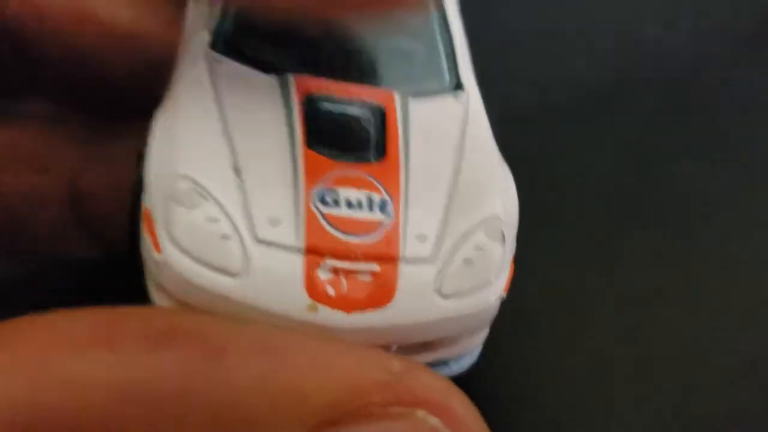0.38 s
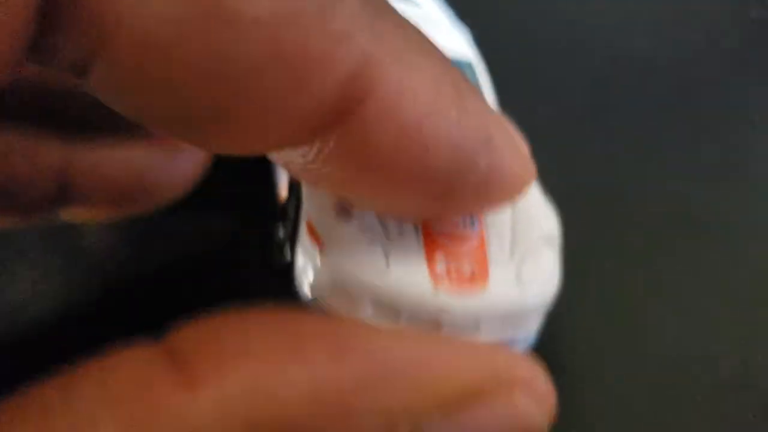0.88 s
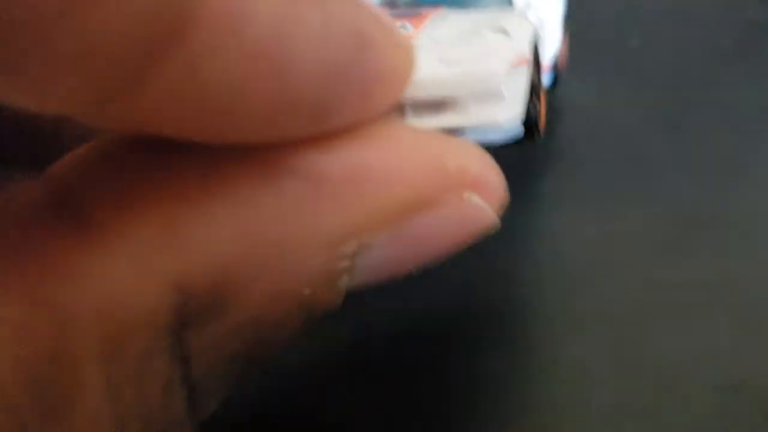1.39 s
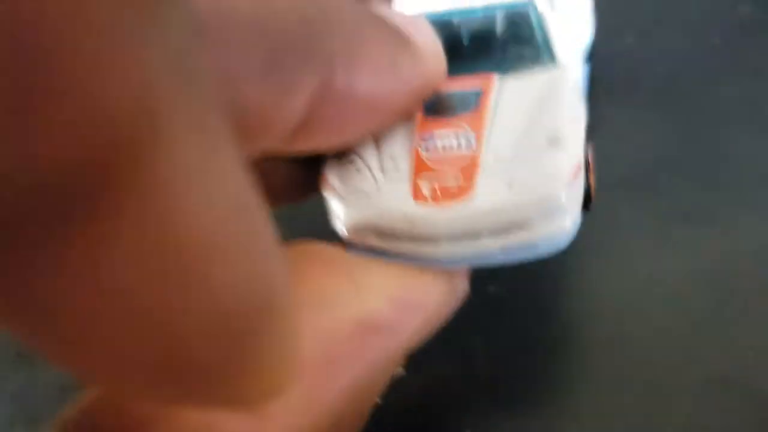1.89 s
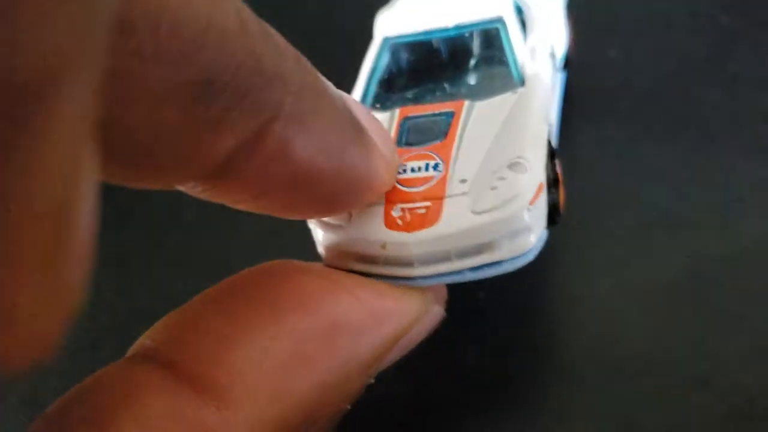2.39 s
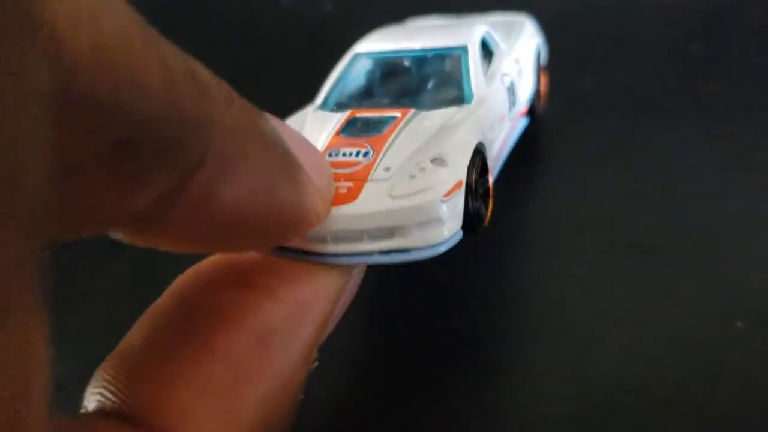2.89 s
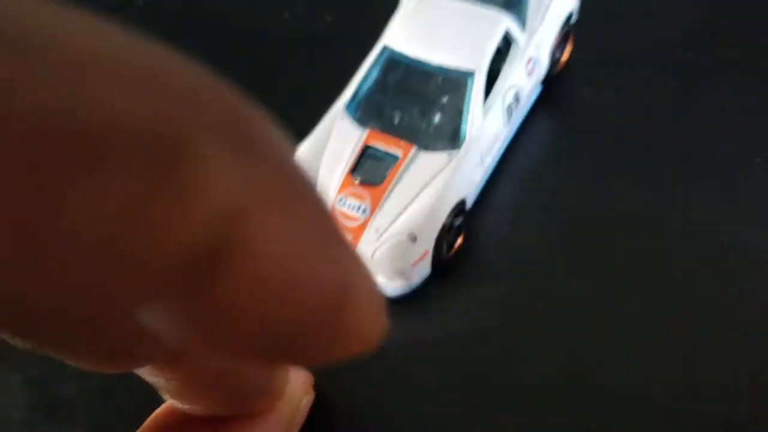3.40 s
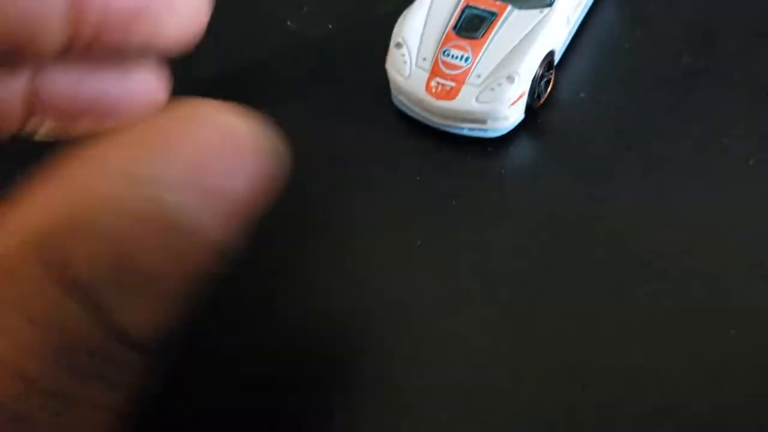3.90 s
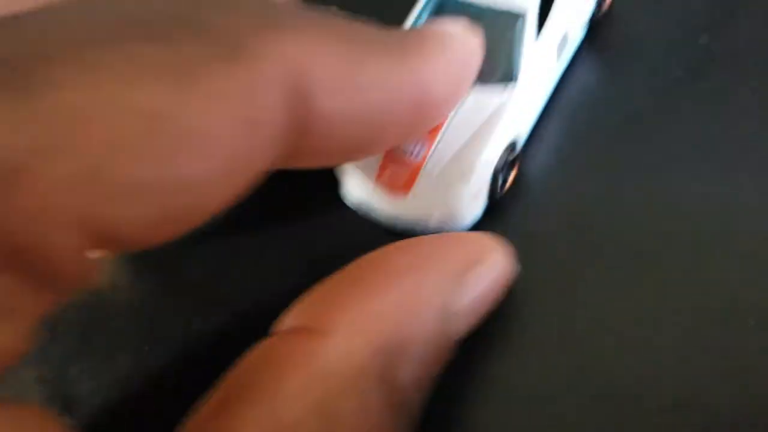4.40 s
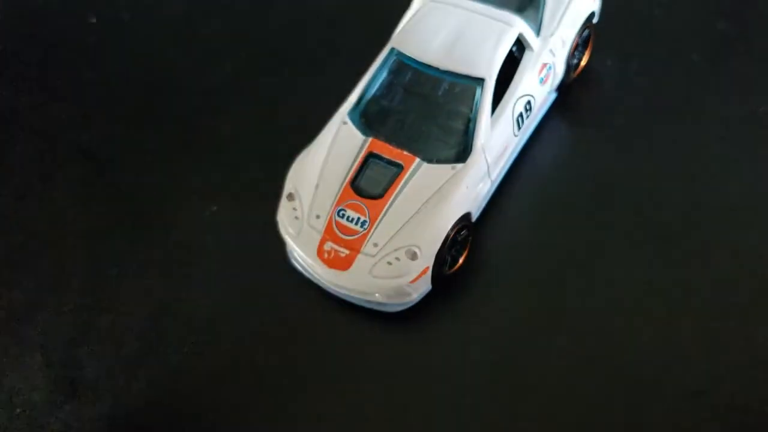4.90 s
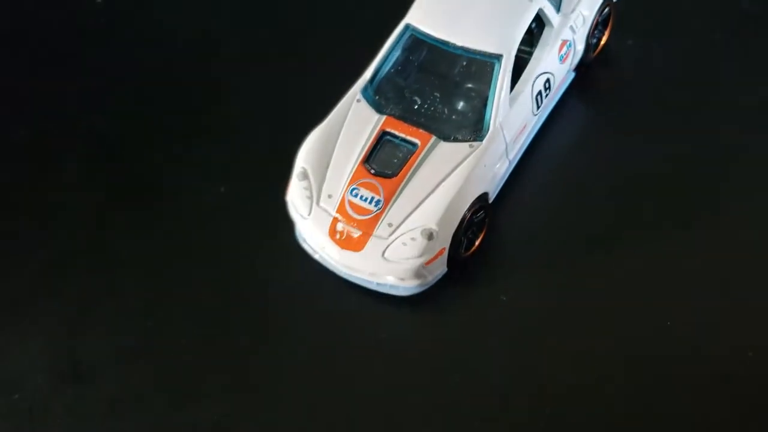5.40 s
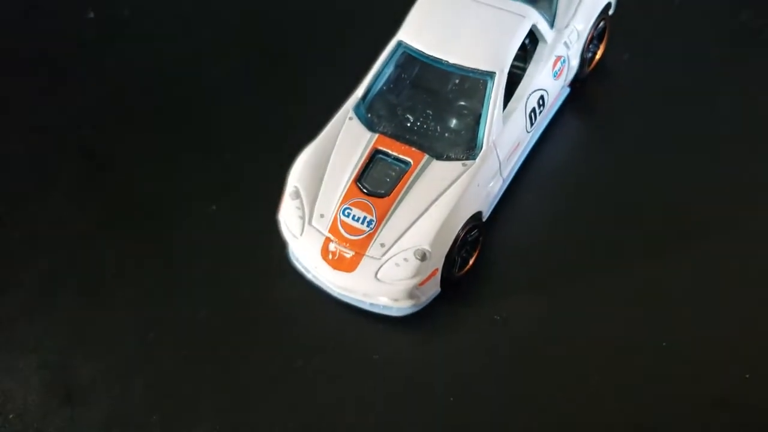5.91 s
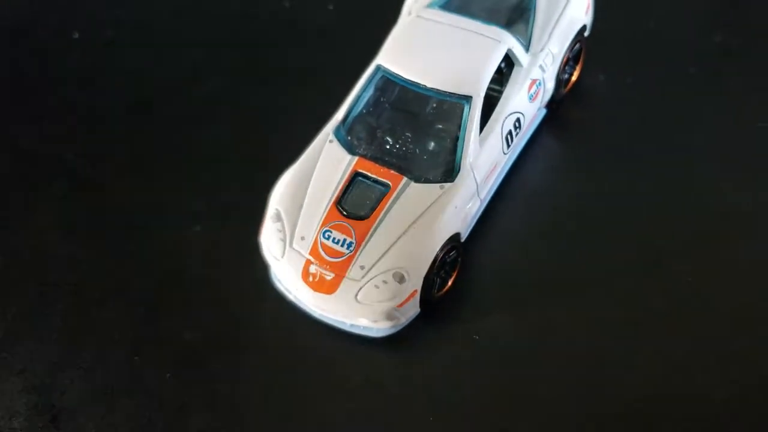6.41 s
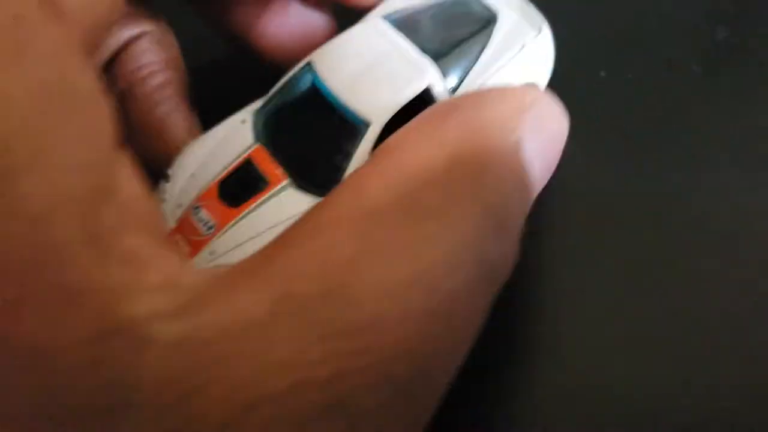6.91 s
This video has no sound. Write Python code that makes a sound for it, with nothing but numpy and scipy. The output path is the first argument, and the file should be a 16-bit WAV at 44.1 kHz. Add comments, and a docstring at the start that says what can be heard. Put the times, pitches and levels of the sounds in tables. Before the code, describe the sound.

A toy car's metal shell and wheels click and scrape on a tabletop, then coarse finger friction fills the left side, including a hard pop. A brief flurry of bright, overlapping metal knocks with dull table thuds is the loudest moment. The room drops to soft hiss and low hum, with slight wheel rubbing and skin rustle, before the car is gripped again with a short gritty scrape. Dry, close and intimate.

```python
"""A small die-cast toy car, turned by fingers close to a two-port microphone, ticks, drops and clatters.
Knocks are noise bursts ringing the metal shell; cracks are short single tones, thuds are damped swings.
A fingertip drags beside the left port: grains of noise and two snaps. Scrapes, table rumble and hum, and
skin rustle are swelling grains of noise too. Behind it lies the filtered noise of a quiet room."""
import sys
import numpy as np
from scipy import signal
from scipy.fft import rfft, irfft
from scipy.io import wavfile
from scipy.ndimage import uniform_filter1d

SR = 44100
rng = np.random.default_rng(int(sys.argv[2]) if len(sys.argv) > 2 else 0)


def generate_wav(sig):
    """Save sig (samples, or channels by samples) to the path in sys.argv[1] as 16-bit PCM at SR."""
    pcm = np.round(np.clip(np.atleast_2d(sig).T, -1, 1) * 32767).astype(np.int16)
    wavfile.write(sys.argv[1], SR, pcm)


def field_ratio(decibels):
    """Amplitude ratio for a level in dB (20 dB per decade); scalars and array-likes work."""
    return 10 ** (np.asarray(decibels, dtype=float) / 20)


N = 310464  # length in samples
GRID = np.fft.rfftfreq(4096, 1 / SR)  # frequencies in Hz at which filters are drawn


def read(points, hz):
    """Reads a table of (Hz, value) at any frequency, with straight lines on a log pitch scale."""
    f, value = np.transpose(points)
    return np.interp(np.log(hz + 1), np.log(f + 1), value)


def causal(gain):
    """Minimum-phase filter taps, which ring only after a blow, for a gain from 0 Hz to SR / 2."""
    log = np.log(np.maximum(gain, 1e-5))
    full = np.concatenate([log, log[-2:0:-1]])
    return np.fft.ifft(np.exp(np.conj(signal.hilbert(full)))).real[:len(gain)]


def colour(x, gain):
    """Filters x so that white noise keeps its power."""
    taps = causal(gain)
    taps = taps / np.linalg.norm(taps)
    return signal.oaconvolve(x, taps[None], axes=1)[:, :N]


def sides(x, points, share):
    """Sets left above right by twice the table's dB; share (0 to 2) is how much of it lifts the left."""
    tilt_db = read(points, GRID)
    taps = np.array([causal(field_ratio(share * tilt_db)), causal(field_ratio((share - 2) * tilt_db))])
    return signal.oaconvolve(x, taps, axes=1)[:, :N]


def grit(per_s, spread_db, same, lag):
    """Stick-slip grains of uneven size, power 1; partly shared by the ports, the left one late by lag ms."""
    size = field_ratio(spread_db * np.minimum(rng.exponential(1, N), 5))
    size = size * (rng.random(N) < per_s / SR)
    size = np.sqrt(uniform_filter1d(size ** 2, size=12) + 1e-12)
    a, b = size * rng.standard_normal((2, N))
    same = np.clip(same, 0, 1)
    late = np.interp(np.arange(N) - lag * SR / 1000, np.arange(N), a)
    left = same * late + np.sqrt(1 - same ** 2) * np.roll(b, 3)
    both = np.array([left, a])
    return both / np.sqrt(np.mean(both ** 2))


def resonate(x, hz, width):
    """A resonance of gain 1, width in Hz, whose pitch follows the curve hz."""
    turn = np.exp(2j * np.pi * np.cumsum(hz) / SR)
    r = np.exp(-np.pi * width / SR)
    return 2 * (turn * signal.lfilter([1 - r], [1, -r], x / turn)).real


def swells(rows, levels_db):
    """Gain over time of overlapping swells, added in power; rows start with peak, rise and fall."""
    edge_db, roundness = -17.5, 1.28  # level one rise or fall away from the peak; 1 = pointed, 2 = round top
    t, power = np.arange(0, N, 32) / SR, 0
    for (peak, rise, fall, *_), db in zip(rows, levels_db):
        away = np.where(t < peak, (peak - t) / rise, (t - peak) / fall)
        power = power + field_ratio(np.maximum(db + edge_db * away ** roundness, -200)) ** 2
    return np.interp(np.arange(N) / SR, t, np.sqrt(power))


# Colour of the room tone. Each row: frequency in Hz, relative level in dB.
ROOM_COLOUR = [(12, -39.5), (20, -8.5), (68, -3.5), (120, -11), (138, -26), (193, -15.5), (262, -24),
               (301, -22), (780, -34.5), (1190, -21.5), (1710, -11), (2820, -36), (4420, -28.5),
               (6540, -39), (16000, -37.5)]
# Balance of the room tone; a whirr near 1.6 kHz sits left. Each row: frequency in Hz, left over right in dB.
ROOM_BALANCE = [(60, 1), (110, 0), (200, 1), (380, 4), (700, 2.5), (1290, 21.5), (2380, 16), (4400, 10),
                (8120, 5.5), (15000, -1)]
# How alike the ports hear the room. Each row: frequency in Hz, likeness (1 = same, negative = opposed).
ROOM_LIKENESS = [(60, 0.692), (240, 0.42), (950, -0.35), (3770, -0.06), (15000, 0.22)]
# The room tone sinks after the clatter. Each row: time in seconds, change of level in dB.
ROOM_LEVEL = [(3.3, 2), (3.55, -4), (3.78, -13.5), (3.95, -6.5), (4.2, -9), (4.9, 2)]


def room():
    """Room tone: filtered noise, more alike at the two ports in the lows than higher up."""
    hz = np.fft.rfftfreq(N, 1 / SR)
    a, b = rfft(rng.standard_normal((2, N)), axis=1)
    same = np.clip(read(ROOM_LIKENESS, hz), -1, 1)
    tilt_db = read(ROOM_BALANCE, hz)
    left = a * field_ratio(tilt_db / 2)
    right = (same * a + np.sqrt(1 - same ** 2) * b) / field_ratio(tilt_db / 2)
    mid = np.sqrt(field_ratio(tilt_db) + field_ratio(-tilt_db) + 2 * same) / 2  # size of the average of both ports
    tone = irfft(np.array([left, right]) * field_ratio(read(ROOM_COLOUR, hz)) / mid, N, axis=1)
    change_db = np.interp(np.arange(N) / SR, *np.transpose(ROOM_LEVEL))
    return field_ratio(-68.5 + change_db) * tone / np.std(tone.mean(0))


# How long the room echoes. Each row: frequency in Hz, time to die by 60 dB in seconds.
ECHO_TIME = [(150, 0.15), (1000, 0.25), (4000, 0.13), (12000, 0.13)]


def echo(x):
    """Room echo: sparse taps of random sign, each band dying at its own speed."""
    taps = np.zeros((2, SR // 2))
    at = np.arange(120, SR // 2 - 20, 20)
    at = at + rng.integers(0, 20, (2, len(at)))
    np.put_along_axis(taps, at, rng.choice([-1., 1.], at.shape), 1)
    hz, t, z = signal.stft(taps, SR, nperseg=256)
    decay = field_ratio(-60 * t / read(ECHO_TIME, hz)[:, None])
    tail = signal.istft(z * decay, SR, nperseg=256)[1]
    return signal.oaconvolve(x, tail / np.linalg.norm(tail[0]), axes=1)[:, :N]


# Ways the table top rings. Each row: frequency in Hz, width in Hz, relative level in dB.
TABLE_MODES = [(80, 51, -1.5), (138, 43, 2), (224, 66, -0.5), (379, 12, 2.5), (485.4, 100, -2),
               (648, 75, -8.5), (780.3, 40, -8), (1342, 36, -12)]


def table_gain(first=0, last=None):
    """Summed resonances of the table top, from the chosen rows of its table."""
    power = 0
    for hz, width, db in TABLE_MODES[first:last]:
        power = power + field_ratio(2 * db) / (1 + (2 * (GRID - hz) / width) ** 2) ** 1.35
    return np.sqrt(power) * GRID / (GRID + 40)


# Extra swells of skin rustle, some during strokes of the car. Each row: peak in seconds, rise in seconds,
# fall in seconds, level in dB.
RUSTLE_SWELLS = [(1.0, .5, 0.17, -77), (1.36, .05, .03, -60), (1.861, .08, 0.055, -65.5),
                 (3.12, 0.17, .2, -62.5), (3.96, .1, .4, -70.5), (4.45, .2, .25, -70.5),
                 (4.819, .2, .12, -61), (5.29, .06, .2, -70.5), (5.51, 0.029, 0.16, -61),
                 (5.59, .12, 0.2, -64.5), (5.96, .025, 0.089, -60.5), (6.05, .1, 0.09, -69),
                 (6.7, .15, 0.11, -59.5), (6.86, .03, .1, -59.5), (7.0, .1, .1, -55)]
# Colour of the skin rustle. Each row: frequency in Hz, relative level in dB.
RUSTLE_COLOUR = [(3530, -42.5), (6000, -14.5), (7740, -7.5), (9460, -23), (11900, -6.5), (15000, -4),
                 (16000, -4.5)]
# Balance of the rustle. Each row: frequency in Hz, half of left over right in dB.
RUSTLE_BALANCE = [(5000, 1), (8100, -3.5), (12000, -6), (15000, -1.5)]


def rustle(contact):
    """Skin rustle: fine, fast grains that follow the contact, with extra swells added in power."""
    with_contact = field_ratio(-70) * contact ** 0.88
    extra = swells(RUSTLE_SWELLS, np.transpose(RUSTLE_SWELLS)[-1])
    skin = np.hypot(with_contact, extra)
    grains = colour(skin * grit(15000, 1.5, 0.17, .05), field_ratio(read(RUSTLE_COLOUR, GRID)))
    return sides(grains, RUSTLE_BALANCE, 0.11)


# Wheels roll and the table hums up. Each row: start in seconds, end in seconds, lift in dB.
ROLLS = [(2.99, 3.478, 11), (3.91, 4.3, 5), (4.32, 4.617, 6.5), (4.622, 4.93, 11), (6.674, 6.705, 9)]


def hum(contact):
    """Table hum: grains ring the upper modes of the table, growing faster than the contact."""
    t = np.arange(N) / SR
    lift_db = sum(1. * db * (t > start) * (t < end) for start, end, db in ROLLS)
    lift_db = uniform_filter1d(lift_db, size=1500)  # soft edges
    gain = field_ratio(-65.5 + lift_db) * contact ** 1.2
    return colour(gain * grit(2700, 2.6, 0.93, 0.025), table_gain(first=5))


# Pitch that the table rumble leans to. Each row: time in seconds, pitch in Hz.
RUMBLE_LEAN = [(1.08, 300), (1.21, 380), (1.49, 383), (1.62, 212), (3.0, 455), (3.15, 376), (3.22, 181),
               (3.34, 219), (3.86, 221), (3.97, 467), (4.22, 212), (4.55, 237), (4.85, 347.4),
               (4.95, 167.3), (6.52, 176), (6.63, 415), (6.83, 280), (6.93, 347), (7.04, 258)]


def rumble(lean):
    """Table rumble: grains ring the low modes of the table, with a resonance that wanders in pitch."""
    low = colour(lean * grit(2000, 0.99, 0.9, 0.055), table_gain(last=5))
    pitch_hz = np.interp(np.arange(N) / SR, *np.transpose(RUMBLE_LEAN))
    return low + field_ratio(6.5) * resonate(low, pitch_hz, 120)


# Colour of wheels and shell scraping. Each row: frequency in Hz, relative level in dB.
SCRAPE_COLOUR = [(530, -36), (900, -11.5), (1110, -2), (1610, -3.5), (1680, -9), (1840, -1), (1990, -6),
                 (3650, -3), (4890, -5), (5350, -10), (10000, -34), (13000, -61.5), (22000, -120)]


def scrape(press):
    """Wheels and shell scrape: dense stick-slip grains; a hard scrape makes the shell sing."""
    rasp = colour(press * grit(6800, 0.93, 0.24, 0.076), field_ratio(read(SCRAPE_COLOUR, GRID)))
    sing = 4.7 * press ** 2 / (press ** 2 + field_ratio(-86))
    ring = resonate(rasp[1], np.full(N, 3750.), 350)
    return rasp + sing * ring * np.array([[-.45], [1.1]])  # opposed at the two ports


# Swells of scrape and rumble; a stroke may take several overlapping swells. Each row: peak in seconds,
# rise in seconds, fall in seconds, scrape level in dB, table rumble level in dB.
STROKE_SWELLS = [(0.0, .1, 0.4, -65.5, -72.5), (0.351, 0.37, 0.25, -89.5, -77),
                 (0.676, 0.16, 0.25, -51.5, -66.5), (0.719, 0.028, 0.06, -49.5, -47),
                 (1.041, .3, 0.17, -61.5, -76), (1.215, 0.0036, 0.036, -54, -47.5),
                 (1.361, 0.055, 0.024, -45.5, -51), (1.29, 0.039, 0.11, -66.5, -55.5),
                 (1.46, 0.067, 0.062, -59, -54.5), (1.51, 0.11, 0.12, -57.5, -73),
                 (1.78, 0.53, 0.34, -69, -84), (3.03, 0.086, 0.36, -54.5, -62),
                 (3.16, 0.14, 0.26, -50.5, -68), (3.238, 0.01, 0.062, -49.5, -54),
                 (3.321, 0.015, 0.033, -37.5, -57), (3.499, 0.06, 0.059, -45.5, -50),
                 (3.56, 0.062, 0.15, -54, -67), (3.64, 0.2, 0.21, -70.5, -65.5),
                 (3.98, 0.17, 0.53, -63.5, -70), (4.401, .17, 0.4, -61.5, -63),
                 (4.549, 0.43, 0.2, -58, -85), (4.819, .22, 0.16, -51.5, -71.5),
                 (4.9, 0.11, .025, -59.5, -79), (5.3, 0.077, 0.27, -69, -86),
                 (5.991, .01, .12, -65.5, -91.5), (6.46, 0.11, 0.1, -61, -89.5),
                 (6.522, 0.0098, 0.14, -50, -60), (6.71, 0.166, 0.24, -52.5, -65.5),
                 (6.868, 0.0176, 0.16, -42, -52), (6.895, .03, 0.062, -40.5, -56),
                 (6.935, 0.055, 0.037, -41, -51.5), (6.99, .08, .08, -50, -57.5),
                 (7.03, .03, 0.093, -44, -55.5)]
# Balance of sound from the car. Each row: frequency in Hz, half of left over right in dB.
CAR_BALANCE = [(60, -2.5), (110, -2), (200, -0.5), (380, 0), (700, -1.5), (1290, -1), (2380, -5),
               (4400, -2.5), (8120, 1), (15000, -10)]


def handling():
    """Strokes of fingers and car: the car scrapes, the table rumbles and hums under it, skin rustles."""
    scrape_db, rumble_db = np.transpose(STROKE_SWELLS)[-2:]
    press = swells(STROKE_SWELLS, scrape_db)
    lean = swells(STROKE_SWELLS, rumble_db)
    contact = np.sqrt(press * lean) / field_ratio(-58.5)  # 1 where hum and rustle have their base levels
    car = scrape(press) + rumble(lean) + hum(contact)
    return sides(car, CAR_BALANCE, 1.0) + rustle(contact)


# Two drags of the fingertip, a list of rows for each. Each row: time in seconds, pressure as a level in dB.
DRAGS = [
    [(1.874, -64.5), (1.891, -31.5), (1.905, -30), (1.93, -36.5), (1.95, -38), (2.016, -28.5),
     (2.048, -30.5), (2.082, -43.5), (2.132, -32), (2.236, -27.5), (2.322, -39.5), (2.345, -65)],
    [(2.438, -75), (2.458, -50), (2.504, -36.5), (2.606, -39.5), (2.73, -34), (2.838, -37), (2.914, -31.5),
     (2.996, -35), (3.004, -45), (3.06, -45.5), (3.075, -55)],
]
# Colour of the drag's body. Each row: frequency in Hz, relative level in dB.
DRAG_COLOUR = [(88, -69), (150, -16), (255, -13), (293, -9.5), (506, 4), (906, 2.5), (1460, 3.5), (1800, 1),
               (2250, 1), (3570, 5), (7200, -4.5), (9000, -22), (11700, -59), (19800, -120)]
# Colour of the drag's treble. Each row: frequency in Hz, relative level in dB.
DRAG_TREBLE = [(7000, -39.5), (8700, -7.5), (11000, 0.5), (14500, 2.5), (16500, -11)]
# How little reaches the right port. Each row: frequency in Hz, half of left over right in dB.
DRAG_BALANCE = [(60, 1), (110, 6), (200, 41), (380, 48), (700, 18), (1290, 17), (2380, 39), (4400, 32),
                (8120, 40), (15000, 23)]
# The fingertip snaps free. Each row: start in seconds, level in dB, level of its slow push against it in dB.
SNAPS = [(1.891, -25.5, 9), (2.1779, -8, -2)]


def rub():
    """A fingertip drags beside the left port: stick-slip grains, a drifting hollow tone and two snaps."""
    t, drag = np.arange(N) / SR, np.zeros(N)
    for rows in DRAGS:
        s, db = np.transpose(rows)
        drag += field_ratio(np.interp(t, s, db, left=-200, right=-200))
    body = colour(drag * grit(7000, 0.81, 0.52, -.5), field_ratio(read(DRAG_COLOUR, GRID)))
    catches = colour(drag * grit(2500, 2.0, .6, -.5), field_ratio(read(DRAG_COLOUR, GRID)))
    hollow_hz = 1300 - 120 * np.sin(2 * np.pi * 3.1 * t)  # the hollow under the finger drifts
    hollow = resonate(resonate(catches, hollow_hz, 620), hollow_hz, 620)
    body += field_ratio(1.5) * hollow
    treble = colour(drag * field_ratio(-18.5) * grit(12000, 2.0, 0.27, -0.99), field_ratio(read(DRAG_TREBLE, GRID)))
    snaps, t = np.zeros(N), np.arange(300) / SR
    for s, db, push_db in SNAPS:
        snap = -np.sin(2 * np.pi * 3200 * t) * np.exp(-((t - .0004) / 0.00023) ** 2)
        push = np.sin(2 * np.pi * 520 * t) * t / 0.00102 * np.exp(-t / 0.00108)
        snaps[round(s * SR):][:300] += field_ratio(db) * (snap + field_ratio(push_db) * push)
    return sides(body + treble + snaps, DRAG_BALANCE, share=0)


# Dull thuds of fingers and wheels on the table. Each row: start in seconds, level in dB, pitch in Hz.
TABLE_THUDS = [(0.7033, -24.5, 586), (0.716, -30.5, 380), (0.748, -34.5, 376), (1.216, -32.5, 463),
               (1.224, -32.5, 404), (1.334, -34, 480), (3.239, -36, 95), (3.349, -25.5, 203),
               (3.362, -17.5, 380), (3.4013, -19.5, 380), (3.441, -25, 197), (3.447, -24, 382),
               (3.471, -30, 151), (3.873, -54.5, 299), (4.187, -53, 80), (4.2, -58, 200),
               (6.52, -38.5, 128), (6.698, -50, 800)]


def thuds():
    """Each thud is a heavily damped swing, nearly alike at both ports."""
    out, t = np.zeros(N + 4000), np.arange(4000) / SR
    for s, db, hz in TABLE_THUDS:
        cycles = hz * t
        swing = -np.sin(2 * np.pi * cycles) * np.exp(-cycles) * (1 - np.exp(-cycles / 0.074))
        out[round(s * SR):][:4000] += field_ratio(db) * swing / abs(swing).max()
    return out[:N] * field_ratio(np.array([[-.7], [.7]]))


# Clean metal-on-metal cracks, most inside hard knocks. Each row: time in seconds, level in dB, pitch in Hz,
# left over right in dB.
METAL_CRACKS = [(0.6935, -14.5, 5240, -15), (0.6938, -5.5, 4560, -11.5), (0.6941, -9, 5300, -10.5),
                (1.0385, -19, 3210, -9), (1.1296, -29, 3140, -6), (1.3651, -27, 4390, -9),
                (3.3492, -5, 4030, -6.5), (3.3534, -11, 3850, -7), (3.3632, -6, 4450, 5),
                (3.3673, -13, 3760, -7.5), (3.3735, -5, 3250, -8), (3.402, -3, 4635, 8),
                (3.4108, -5.5, 4430, -5.5), (3.4203, -10.5, 3430, -7), (3.4234, -14.5, 3900, -3),
                (3.4477, -11, 4000, -3), (3.4493, -9, 4140, -2.5), (3.451, -9.5, 4180, -4.5),
                (3.4718, -11.5, 4194, 0), (3.473, -11, 4290, -0.5), (3.4745, -9.5, 3960, -9)]


def cracks():
    """A few cycles of one shell mode, rising and fading within a few milliseconds."""
    rise_s, fall_s = .0004, 0.0006
    port_turn = np.array([[0], [2.16]])  # radians by which the ring differs between the ports
    out, t = np.zeros((2, N)), np.arange(-60, 300) / SR
    shape = np.where(t < 0, np.exp(-(t / rise_s) ** 2), np.exp(-t / fall_s))
    for (s, db, hz, pan_db), turn in zip(METAL_CRACKS, rng.random(len(METAL_CRACKS))):
        ring = np.cos(2 * np.pi * (hz * t + turn) - port_turn)
        level = field_ratio(db + np.array([[pan_db], [-pan_db]]) / 2)
        out[:, round(s * SR) - 60:][:, :len(t)] += level * shape * ring
    return out


# Knocks of car, axles and wheels. Each row: start in seconds, level in dB, centre of pitch in Hz,
# left over right in dB, treble lift in dB.
CAR_KNOCKS = [(0.5188, -45, 2944, -8, -19), (0.5477, -38.5, 3720, -6, -8),
              (0.5943, -30.5, 4250, -11.5, 0.5), (0.61, -25.5, 4330, -7, 7), (0.6495, -24, 3850, -8, 7),
              (0.6909, -10.5, 5140, -7.5, 1.5), (0.6998, -13.5, 4900, 5.5, -17),
              (0.7142, -32, 5370, 0.5, -4), (0.7478, -33, 4700, 5.5, -7), (0.808, -30.5, 3400, -9, -15),
              (0.9574, -30, 3920, -9.5, 2), (0.9668, -26, 3340, -5, -5), (1.032, -37, 3720, 10.5, -18),
              (1.036, -20, 2180, -11, -12), (1.0934, -33, 2700, -3, -22), (1.0968, -40, 3500, -2, -8),
              (1.128, -35, 2900, -10.5, -20), (1.1404, -38.5, 3620, 10, -25), (1.217, -41, 2700, -15, -10),
              (1.2228, -31.5, 2640, -4, -35), (1.3645, -29, 4380, -8.5, -3), (1.5089, -38.5, 2840, -4, -35),
              (3.2404, -34, 2760, -7, -5), (3.3135, -28, 3600, -6, 2), (3.327, -27.5, 3900, -6.5, 1),
              (3.348, -4.5, 4000, -7.5, -0.5), (3.362, -4, 4216, -0.5, 9.5), (3.3731, -4.5, 3060, -9.5, -2),
              (3.4011, -7, 4586, 6, -1.5), (3.4081, -4.5, 3100, -6.5, -2), (3.419, -7.5, 3910, -7, 2),
              (3.4266, -16, 3470, -7, 1.5), (3.4289, -8.5, 4270, 2, 5.5), (3.4415, -14.5, 4240, -4, 7),
              (3.4461, -7.5, 2920, -4, 0.5), (3.4505, -10.5, 4094, -2, 0.5),
              (3.4581, -10.5, 4030, -3.5, -7), (3.4712, -4, 4640, -0.5, 5), (3.485, -13, 3885, 1.5, -2),
              (3.501, -20.5, 3900, -3, -5.5), (3.51, -26, 4476, 1, -3.5), (3.874, -48, 2410, -5.5, -8),
              (4.188, -51.5, 7500, 0, 5), (4.1984, -44, 4500, -4, 0), (4.324, -45, 4500, -1, -4),
              (5.9906, -40, 3410, 16.5, 10.5), (6.5211, -36, 3750, -4, -12), (6.874, -26, 3800, -7, -2),
              (6.8861, -25.5, 3700, -5, -7.5), (6.9, -27, 3470, -6, -8), (6.919, -27, 3700, 4, -10.5),
              (6.9425, -25, 4020, -7, -14), (7.0232, -31.5, 2790, -7, -11)]
# Dense, damped ringing of shell and axles. Each row: frequency in Hz, relative level in dB.
CAR_COLOUR = [(530, -35.5), (900, -18.5), (1340, -11.5), (1550, -14), (1680, -8.5), (2630, -5),
              (3470, -6.5), (4680, -5), (6720, -13.5), (7680, -8), (9530, -17.5), (14900, -8.5),
              (16000, -45)]


def knocks():
    """A sharp contact and the loose rattle after it ring the car, most near the knock's pitch; the table thumps."""
    out, push = np.zeros((2, N + 8000)), np.zeros((2, N + 8000))
    t = np.arange(3000) / SR
    noise = rng.standard_normal((len(CAR_KNOCKS), 3, 3000))
    bright = GRID ** 6 / (GRID ** 6 + 8500 ** 6)  # share of the treble range
    for (s, db, centre_hz, pan_db, treble_db), n in zip(CAR_KNOCKS, noise):
        u = t / (0.0014 * field_ratio(0.21 * (db + 16.5)))  # harder knocks chatter longer
        contact = u ** 1.2 * np.exp(.9 - u)
        rattle = field_ratio(-23.0 - 60 * t / 0.17) * (1 - np.exp(-t / 0.0019))
        drive = (contact + rattle) * (n[:2] + 0.4 * n[2] * np.array([[1], [-1]]))
        near_db = 9.5 / (1 + ((GRID - centre_hz) / 650) ** 2)
        near_db += 2.1 * np.interp(GRID, np.arange(90) * 230.0, n[2, :90])  # each spot wakes its own modes
        ringing = causal(field_ratio(read(CAR_COLOUR, GRID) + near_db + bright * treble_db))
        hit = signal.fftconvolve(drive, ringing[None], axes=1)
        at = round(s * SR) - 10
        pan = field_ratio(np.array([[pan_db], [-pan_db]]) / 2)
        out[:, at:at + hit.shape[1]] += field_ratio(db) * pan * hit / abs(hit).max()
        push[:, at + 30] += field_ratio(db - 4) * np.sign(n[0, 0])  # one short push up or down on the table
    return out[:, :N] + colour(push[:, :N], table_gain())


def scene():
    """Everything at the two ports; knocks, cracks and thuds lose their deepest bass."""
    hits = knocks() + cracks() + thuds()
    bass_cut = signal.butter(2, 60, "high", fs=SR, output="sos")  # Hz
    hits = signal.sosfilt(bass_cut, hits)
    return hits + field_ratio(-12.0) * echo(hits) + handling() + rub() + room()


def low_pass(x):
    """Removes everything above the highest recorded frequency."""
    return signal.sosfilt(signal.butter(12, 16800, fs=SR, output="sos"), x)


def record(dry):
    """Gain control eases back around loud stretches and recovers slowly; peaks are clipped."""
    power = uniform_filter1d((dry ** 2).mean(0), size=4000)
    power_db = 10 * np.log10(abs(power) + 1e-12)
    fall = np.arange(N) * 34.0 / SR  # the held level sinks by 34 dB a second
    held_db = np.maximum.accumulate(power_db + fall) - fall
    over_db = np.maximum(held_db + 31.5, 0)
    eased = dry / field_ratio(0.073 * uniform_filter1d(over_db, size=2000))
    mix = np.clip(eased, -1, 1)
    return low_pass(mix)


dry = scene()
out = record(dry)
generate_wav(out)
```